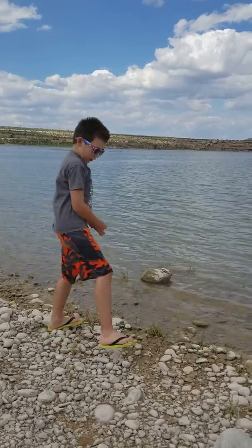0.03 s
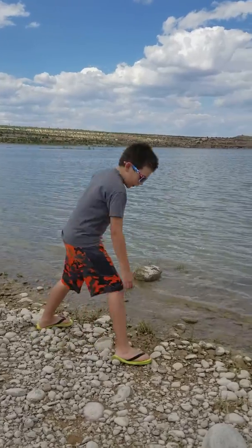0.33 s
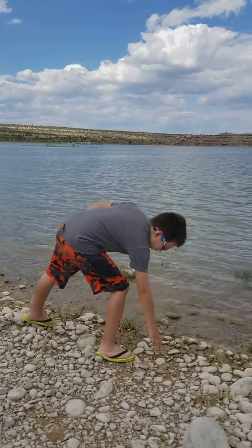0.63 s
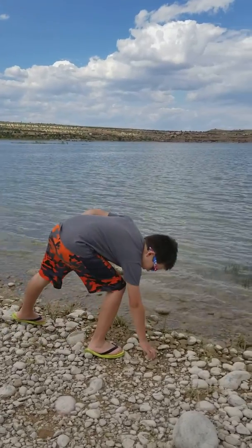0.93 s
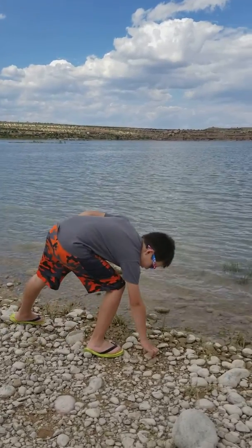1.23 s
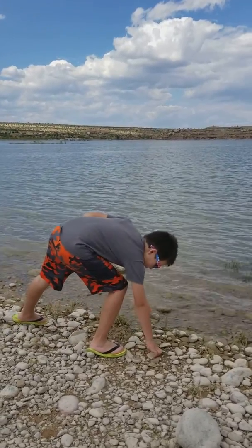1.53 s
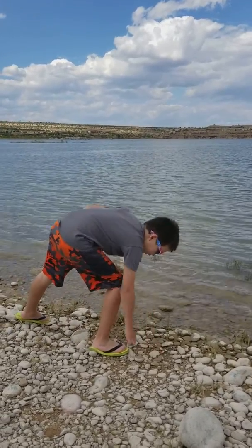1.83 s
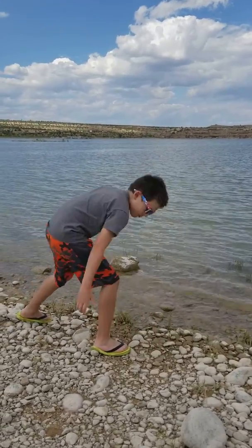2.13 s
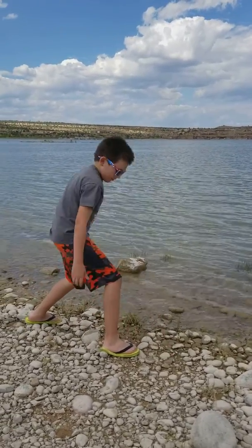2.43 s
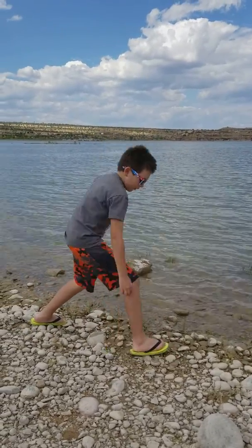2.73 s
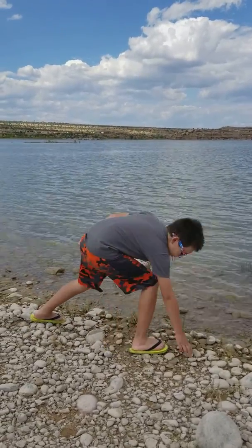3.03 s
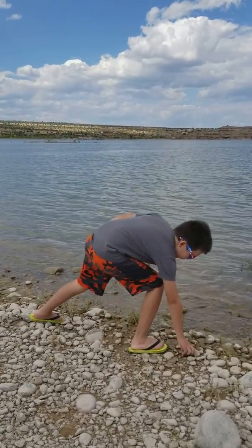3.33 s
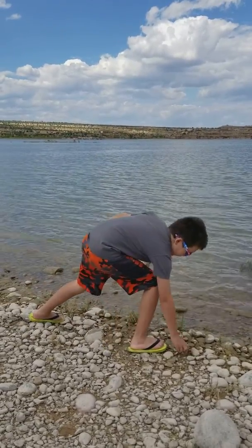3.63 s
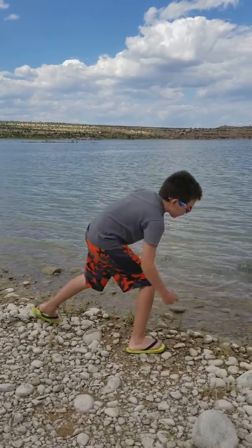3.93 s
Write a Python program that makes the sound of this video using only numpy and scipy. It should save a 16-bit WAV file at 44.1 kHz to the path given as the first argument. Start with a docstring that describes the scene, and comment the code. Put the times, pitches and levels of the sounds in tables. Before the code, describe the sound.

Stones clack together and grit crunches as someone steps on a pebbly lakeshore in the first half second. Ripples then lap and bubble faintly, with a small knock around 1.5 seconds and a light scuff near 2.3. From about 2.8 seconds a hand picks among the stones, which clack at 3.4 and again just before 4. Gusts rumble and thump on the close microphone throughout, over faint hiss.

```python
"""A pebbly lakeshore, heard up close through a microphone with two ports, open to the wind.
In the first half second someone in sandals steps on the shore: grit crunches, stones clack together.
Then ripples lap and bubble faintly at the water's edge, with an odd knock and a light scuff.
In the last second and a half the person picks among the stones, which clack again.
All the way through, gusts buffet the ports with rumble and thumps, over faint air and microphone hiss."""
import sys
import numpy as np
from scipy import signal
from scipy.fft import rfft, irfft
from scipy.io import wavfile
from scipy.ndimage import uniform_filter1d

SR = 44100
rng = np.random.default_rng(int(sys.argv[2]) if len(sys.argv) > 2 else 0)


def unload_wav(signal):
    """Save mono or channel-first audio to the path in sys.argv[1] as 16-bit WAV at rate SR, clipped to [-1, 1]."""
    wavfile.write(
        sys.argv[1],
        SR,
        np.round(np.clip(np.atleast_2d(signal).T, -1, 1) * 32767).astype(np.int16),
    )


N = 176400
TIME = np.arange(N) / SR

# stone meets stone: start_s, level_db, pitch_hz, brightness_db
STONE_CLACKS = [(0.218, -36.5, 1880, -17), (0.3318, -27, 1620, -17.5), (0.3338, -24.5, 2170, -16),
                (0.5249, -37, 2470, -22), (1.462, -44.5, 1700, -22), (2.778, -47.5, 1264, 4),
                (3.3934, -32, 856, -24), (3.3937, -39.5, 2905, -10.5), (3.3941, -27.5, 3120, -23.5),
                (3.848, -52.5, 2830, -16), (3.885, -47.5, 2620, -20), (3.934, -65.5, 3500, 15.5),
                (3.944, -39.5, 3610, -3), (3.9493, -53, 3100, 10), (3.9628, -33.5, 2870, -8.5)]
# the modes a pebble rings with: pitch_ratio, level_db, t60_s, brightness_share
PEBBLE_MODES = [(.2, -15, 0.0022, 0), (.36, -34, 0.006, 0), (.74, 2.5, 0.0028, 1), (1, 6.5, 0.0052, 0.39),
                (1.27, -4.5, 0.0029, 0.049), (1.95, -3, 0.0051, 0.96), (2.65, -10, 0.0079, 1),
                (3.6, -4, 0.0019, 1)]
# a sole or hand drags through grit; the very short row at 2.779 s is instead the sharp crack of the stone knock
# there: peak_s, rise_s, fall_s, crunch_db, hiss_db, crunch_hz
GRIT_SCUFFS = [(0.225, 0.034, 0.077, -66, -79.5, 1720), (0.283, 0.0035, 0.012, -69, -58.5, 2170),
               (0.33, 0.015, 0.013, -53.5, -61.5, 1800), (0.406, 0.032, 0.024, -65, -68, 2190),
               (0.526, 0.0094, 0.035, -65.5, -97, 1830), (0.567, 0.034, 0.037, -72, -70.5, 2600),
               (2.26, 0.075, 0.084, -78.5, -82.5, 2900), (2.7792, 0.00016, 0.0011, -52.5, -68, 1240),
               (2.786, 0.0023, 0.015, -64, -71, 1480), (3.399, 0.012, 0.043, -73, -100, 1130),
               (3.86, 0.029, 0.063, -75, -78, 2940), (3.95, 0.0057, 0.053, -69.5, -78, 3150)]
# spectrum of scuffed sand: frequency_hz, level_db
SAND_SPECTRUM = [(1000, -63), (2500, -50), (4000, 12.5), (5200, 5), (6600, 10.5), (8000, 16), (9200, 12),
                 (11000, 15), (13000, 10), (16000, -16)]
# loose sand shifts, from single ticks to longer rustles: middle_s, half_length_s, level_db
SAND_SHIFTS = [(0.135, 0.025, -80), (0.515, 0.015, -73), (0.82, 0.01, -81), (1.0, 0.07, -80.5),
               (1.91, 0.002, -76.5), (2.215, 0.018, -76.5), (2.644, 0.001, -72), (2.805, 0.004, -65.5),
               (2.95, 0.045, -81), (3.255, 0.0016, -74), (3.377, 0.012, -75.5), (3.868, 0.028, -76)]
# rise and fall of the lapping at the water's edge: time_s, level_db
LAPPING_LEVELS = [(0, -64.5), (.1, -82), (.75, -83), (.9, -74), (1.15, -83.5), (1.65, -84.5), (2.05, -77.5),
                  (2.3, -74.5), (2.55, -83.5), (2.68, -74), (2.87, -81), (3.3, -77), (3.65, -94),
                  (4, -71.5)]
# tone of the ripples' fizz: frequency_hz, gain_db
RIPPLE_TONE = [(500, -0.5), (900, -0.5), (2600, 1), (3500, -9.5), (5000, 0)]
# bubbles at the water's edge: start_s, level_db, start_pitch_hz
EDGE_BUBBLES = [(0.233, -46, 742), (0.248, -42, 603), (1.088, -59, 1270), (2.341, -64, 1405),
                (2.393, -64, 1334), (2.976, -60.5, 1070), (3.231, -62, 1140)]
# gusts on the microphone: middle_s, half_length_s, left_db, right_db, extra_flutter_db
PORT_GUSTS = [(0.0, 0.034, -40, -38.5, -9.5), (0.196, 0.038, -33.5, -39, -4), (0.334, 0.08, -54, -56, -7),
              (0.643, 0.034, -39, -52, 1), (0.958, 0.024, -43.5, -48, -19), (1.034, 0.027, -37, -37, -1.5),
              (1.103, 0.11, -47, -53, -15.5), (1.238, 0.045, -44.5, -43.5, -15),
              (1.344, 0.036, -44.5, -54, -8), (1.443, 0.027, -41.5, -44, -2.5),
              (1.773, .036, -45, -45, -14), (2.066, 0.061, -47, -43.5, -16),
              (2.206, 0.051, -49.5, -44.5, -7), (2.49, 0.034, -34.5, -35.5, -2),
              (2.56, 0.036, -40.5, -47.5, -2.5), (3.005, 0.014, -46, -47, -15),
              (3.175, 0.054, -42.5, -47, -2.5), (3.279, 0.047, -44.5, -44.5, -16),
              (3.491, 0.042, -49.5, -78, 8.5), (3.779, 0.011, -51.5, -90, 1.5),
              (3.963, 0.02, -42, -43.5, -6)]
# spectrum of wind on a port: frequency_hz, level_db
WIND_SPECTRUM = [(25, -7.5), (65, 3), (150, -1.5), (230, -6.5), (400, -6), (560, -18), (800, -35.5),
                 (2000, -86)]
# single eddies thump the ports: start_s, left_db, right_db, pitch_hz, length_cycles
PORT_EDDIES = [(0.159, -27.5, -66, 330, 0.94), (0.258, -27, -46, 414, 0.97), (1.0087, -25, -42, 188, 1.05),
               (1.017, -55, -32.5, 405.5, 13), (2.179, -34, -68, 316, 2.5), (3.2665, -26, -38.5, 377, 2)]
# spectrum of still air and microphone hiss: frequency_hz, level_db
AIR_SPECTRUM = [(100, 11.5), (900, 6.5), (2600, 1.5), (5000, -2.5), (8200, -1.96), (16000, 0)]
# how the two ports colour sound from the shore: frequency_hz, left_minus_right_db
PORT_BALANCE = [(500, 0), (2000, -6.5), (3400, -13), (4300, -9.5), (5600, 20), (6700, -6), (8000, -4.5),
                (9200, -24), (12500, -9), (15000, -21)]

GRAINS_PER_S, GRAIN_SPREAD_DB = 4100, 3.5
GRIT_HZ, GRIT_WIDTH_HZ = 8200, 1300


def clacks(contact_s=0.00018, crack_db=-10.5, crack_t60_s=0.0056, overtone_spread=0.027):
    """Each knock cracks at the contact and briefly rings a pebble with overtones of its own."""
    out, t = np.zeros(N), TIME[:SR // 20]
    contact = 1 - np.exp(-t / contact_s)  # the two stones press together
    for start_s, level_db, pitch_hz, bright_db in STONE_CLACKS:
        stretch = 1 + overtone_spread * rng.uniform(-1, 1, len(PEBBLE_MODES))
        ring = np.zeros(len(t))
        for k, (ratio, mode_db, t60_s, share) in enumerate(PEBBLE_MODES):
            decay = from_db(level_db + mode_db + share * bright_db - 60 * t / t60_s)
            ring += (-1) ** k * decay * np.sin(2 * np.pi * pitch_hz * ratio ** stretch[k] * t)
        crack = resonance(rng.standard_normal(len(t)), GRIT_HZ, 2 * GRIT_WIDTH_HZ)
        crack = rms_one(resonance(crack, GRIT_HZ, width_hz=GRIT_HZ))
        crack *= from_db(level_db + bright_db + crack_db - 60 * t / crack_t60_s)
        add(out, start_s, contact * (ring + crack))
    return out


def scuffs(crunch_width_hz=1200, bed_hz=686, clump_db=2.5):
    """Dense tiny slips: gravel crunches over its packed bed, crushed grains crackle, sand hisses."""
    slips = rms_one(grains(GRAINS_PER_S)) + rng.standard_normal(N)
    sand = rms_one(grains(GRAINS_PER_S)) + rng.standard_normal(N)
    clumps = from_db(clump_db * drift(per_s=43))  # sand gives way in small bursts
    hiss = colour(sand * clumps, SAND_SPECTRUM)
    bed = from_db(-1) * rms_one(double_resonance(sand, bed_hz, width_hz=840))
    crackle = from_db(-19) * rms_one(resonance(grains(GRAINS_PER_S), 14000, 2 * crunch_width_hz))
    out = np.zeros(N)
    for peak_s, rise_s, fall_s, crunch_db, hiss_db, crunch_hz in GRIT_SCUFFS:
        slope_s = np.where(TIME < peak_s, rise_s, fall_s)
        push = np.exp(-np.abs((TIME - peak_s) / slope_s) ** 1.22 / 2)
        crunch = rms_one(double_resonance(slips, crunch_hz, crunch_width_hz))
        coarseness = (2 * bed_hz / crunch_hz) ** 2  # coarse gravel shakes the bed more
        gravel = crunch + coarseness * bed + crackle
        out += push * (from_db(crunch_db) * gravel + from_db(hiss_db) * hiss)
    return out


def grit():
    """Dry sand trickles and ticks between the stones, each grain ringing briefly at a high pitch."""
    pitches = GRIT_HZ * 2 ** np.linspace(-0.12, 0.12, 5)
    trickle = sum(double_resonance(grains(GRAINS_PER_S / len(pitches)), hz, GRIT_WIDTH_HZ)
                  for hz in pitches)
    shifts = sum(from_db(level_db) * np.exp(-((TIME - middle_s) / half_s) ** 2 / 2)
                 for middle_s, half_s, level_db in SAND_SHIFTS)
    return evened(trickle, size=SR // 100) * shifts


def ripples(droplets_per_s=900, droplet_cycles=21.3):
    """Ripples fizz with small ringing droplets as they lap at the shore."""
    pitches = np.geomspace(600, 4000, 18)
    fizz = sum(resonance(grains(droplets_per_s / len(pitches)), hz, 2 * hz / droplet_cycles)
               for hz in pitches)
    lapping = from_db(np.interp(TIME, *np.transpose(LAPPING_LEVELS)))
    return colour(fizz, RIPPLE_TONE) * lapping


def bubbles(attack_s=0.0008, t60_s=0.075, wobble_db=5.5):
    """Larger bubbles ring unevenly at the surface and rise in pitch as they die."""
    out, t = np.zeros(N), TIME[:SR // 10]
    for start_s, level_db, pitch_hz in EDGE_BUBBLES:
        life = from_db(level_db - 60 * t / t60_s) * (1 - np.exp(-t / attack_s))
        wobble = evened(from_db(wobble_db * drift(per_s=77)[:len(t)]), size=SR // 50)
        rise_per_s = rng.uniform(0.75, 9.95)
        tone = np.sin(2 * np.pi * pitch_hz * t * (1 + rise_per_s * t / 2))
        add(out, start_s, life * wobble * tone)
    return out


def wind(rumble_hz=108.3, shared_power=0.24, lump_db=6.5, trim_db=-2):
    """Lumpy turbulence, partly shared by the two ports, swells in half-octave bands with each gust."""
    out, edges = np.zeros((2, N)), 20 * 2 ** np.arange(0, 6.6, .5)
    white = rng.standard_normal((2, 3, N))  # neighbouring bands use separate noise
    lumps_db = lump_db * np.array([drift(per_s=57), drift(per_s=57)])
    for k, (low, high) in enumerate(zip(edges, edges[1:])):
        hz = np.sqrt(low * high)
        shared, own = white[k % 2, 0], white[k % 2, 1:]
        turbulence = np.sqrt(shared_power) * shared + np.sqrt(1 - shared_power) * own
        bandpass = signal.butter(4, [low, high], "band", fs=SR, output="sos")
        band = rms_one(signal.sosfilt(bandpass, turbulence))
        band = evened(band * from_db(lumps_db * hz / (hz + rumble_hz)), size=SR // 16)
        band_gain = from_db(trim_db + at_hz(WIND_SPECTRUM, hz)) * np.sqrt((high - low) / rumble_hz)
        out += band * band_gain * gusts(hz, rumble_hz)
    return out


def gusts(hz, rumble_hz, flutter_hz=331.5, breeze_db=-61, breeze_flutter_db=-8.5):
    """One wind band's gain at each port: gusts over a breeze; the rumble comes sooner and lingers."""
    t = TIME[::50]
    flutter = 1 / (1 + (flutter_hz / hz) ** 4)  # 0 in the rumble, 1 well above it
    linger = 1 + 0.89 / (1 + (hz / rumble_hz) ** 2)
    power = from_db(breeze_db + flutter * breeze_flutter_db) ** 2
    for middle_s, half_s, left_db, right_db, flutter_db in PORT_GUSTS:
        swell = 1 / (1 + np.abs((t - middle_s) / (half_s * linger)) ** 3.5)
        strength = from_db(np.array([[left_db], [right_db]]) + flutter * flutter_db)
        power = power + (strength * swell) ** 2 / linger
    return np.array([np.interp(TIME, t, np.sqrt(port)) for port in power])


def eddies():
    """A small eddy hits the ports with one swing of pressure or a short run of them."""
    out, t = np.zeros((2, N)), TIME[:SR // 10]
    for start_s, left_db, right_db, pitch_hz, cycles in PORT_EDDIES:
        age = t * pitch_hz / cycles
        swell = (2 * age) ** 4 * np.exp(4 - 8 * age)
        add(out, start_s, from_db([[left_db], [right_db]]) * swell * np.sin(2 * np.pi * pitch_hz * t))
    return out


def still_air(level_db=-74):
    """Steady air and microphone hiss, separate in each port."""
    return from_db(level_db) * colour(rng.standard_normal((2, N)), AIR_SPECTRUM)


def pebble_echoes(x, level_db=-6, t60_s=0.033):
    """Sound scatters off the surrounding pebbles and reaches each port by different paths."""
    t = TIME[:SR // 10]
    echoes = rng.standard_normal((2, len(t))) * from_db(-60 * t / t60_s) * (t > .001)
    echoes /= np.linalg.norm(echoes, axis=1, keepdims=True)
    return x + from_db(level_db) * signal.fftconvolve(x[None], echoes, axes=1)[:, :N]


def ports(x, left_lag_s=0.00012, turn_rad=0.72, turn_hz=1500):
    """Shore sound reaches the left port later; each port colours it and the housing turns its phase."""
    hz = np.arange(N // 2 + 1) * SR / N
    balance = from_db(at_hz(PORT_BALANCE, hz))
    housing_turn = turn_rad * np.exp(-2 * np.log((hz + 1) / turn_hz) ** 2)
    phase = 2 * np.pi * hz * left_lag_s + housing_turn
    pair = np.array([balance * np.exp(-1j * phase), np.ones(len(hz))])
    return irfft(rfft(x) * pair * np.sqrt(2 / (1 + balance ** 2)), N)


def from_db(db):
    """Decibels to gain."""
    return 10 ** (np.asarray(db) / 20)


def rms_one(x):
    """Scale to unit power."""
    return x / np.sqrt(np.mean(x ** 2) + 1e-20)


def evened(x, size):
    """Unit power over every stretch of size samples; faster unevenness stays."""
    return x / np.sqrt(np.abs(uniform_filter1d(x ** 2, size, axis=-1)) + 1e-12)


def at_hz(points, hz):
    """Read a spectrum on a log-frequency axis."""
    point_hz, point_db = np.transpose(points)
    return np.interp(np.log(hz + 1), np.log(point_hz), point_db)


def colour(x, points):
    """Shape a signal with a smooth spectrum; unit power."""
    hz = np.arange(N // 2 + 1) * SR / N
    return rms_one(irfft(rfft(x) * from_db(at_hz(points, hz)), N))


def drift(per_s):
    """A smooth random wander of spread 1."""
    step, settle = 40, 2000
    pole = np.exp(-2 * np.pi * per_s * step / SR)
    noise = rng.standard_normal(N // step + settle + 2)
    slow = signal.lfilter([1], [1, -2 * pole, pole * pole], noise)[settle:]
    return np.interp(np.arange(N) / step, np.arange(len(slow)), rms_one(slow))


def grains(per_s):
    """Random clicks of uneven size."""
    sizes = from_db(GRAIN_SPREAD_DB * np.minimum(rng.exponential(1, N), 4))
    return (rng.random(N) < per_s / SR) * sizes * rng.choice([-1, 1], N)


def resonance(x, hz, width_hz):
    """One resonance, gain 1 at its peak."""
    r = np.exp(-np.pi * width_hz / SR)
    feedback = [1, -2 * r * np.cos(2 * np.pi * hz / SR), r * r]
    return signal.lfilter(np.array([1, 0, -1]) * (1 - r * r) / 2, feedback, x + 1e-18)


def double_resonance(x, hz, width_hz):
    """A resonance followed by one twice as wide, for steeper flanks."""
    return resonance(resonance(x, hz, width_hz), hz, 2 * width_hz)


def add(out, start_s, sound):
    """Mix a sound in at a time."""
    i = int(start_s * SR)
    out[..., i:i + sound.shape[-1]] += sound[..., :N - i]


def scene():
    """Stones and water on the shore, wind right on the microphone, still air behind."""
    air = still_air()
    shore = scuffs() + clacks() + ripples() + bubbles() + grit()
    return ports(pebble_echoes(shore)) + wind() + eddies() + air


def record(dry):
    """The recorder cuts the top of the treble steeply."""
    lowpass = signal.firwin(401, cutoff=15720, fs=SR)
    return signal.fftconvolve(dry, lowpass[None], mode="same", axes=1)


dry = scene()
out = record(dry)
unload_wav(out)
```